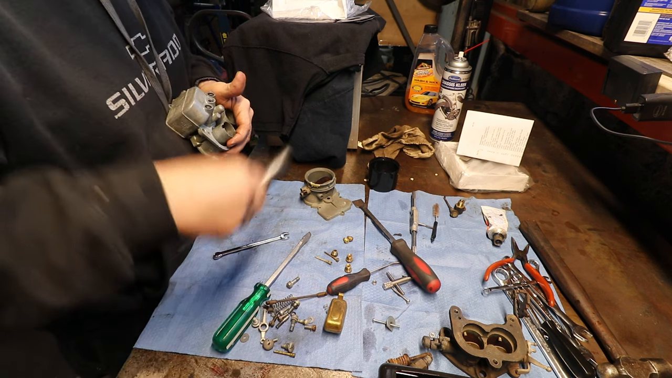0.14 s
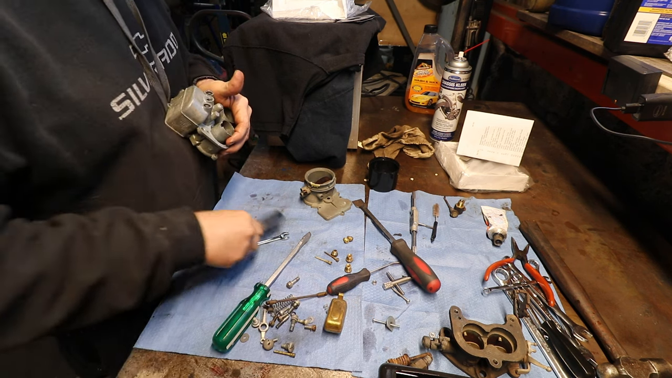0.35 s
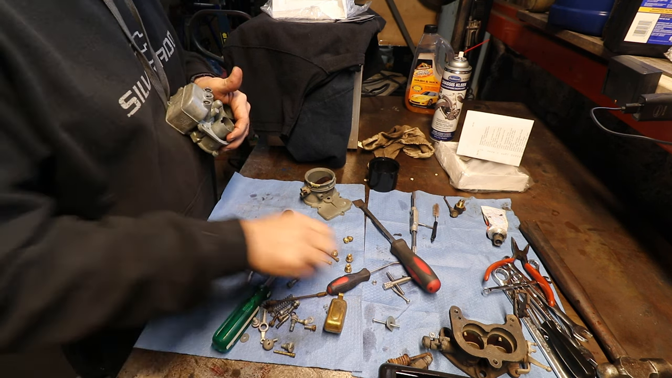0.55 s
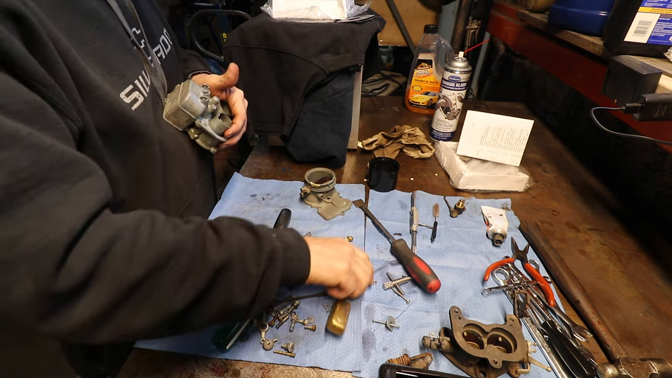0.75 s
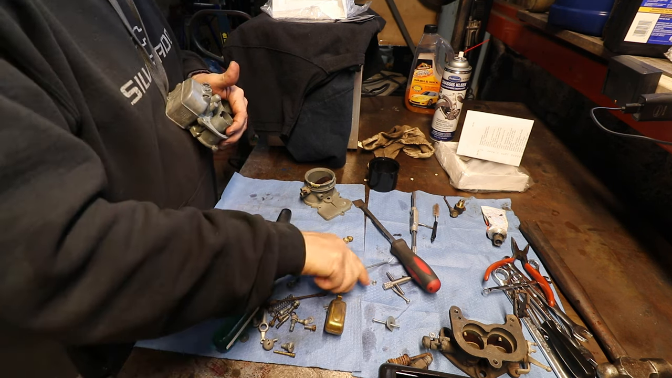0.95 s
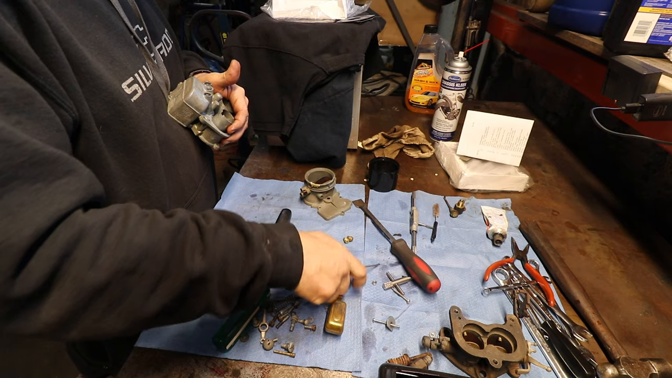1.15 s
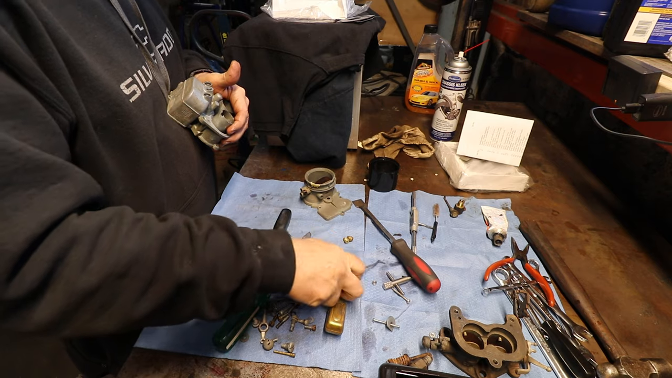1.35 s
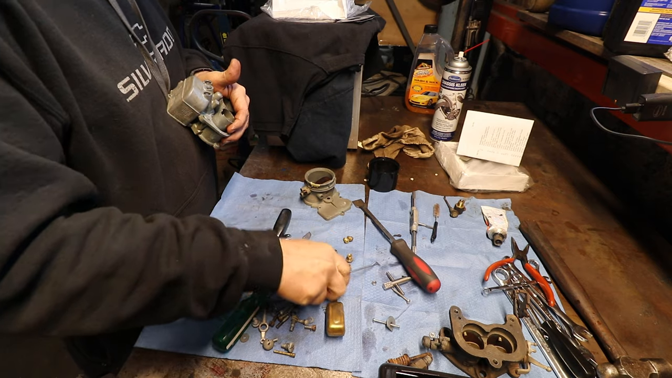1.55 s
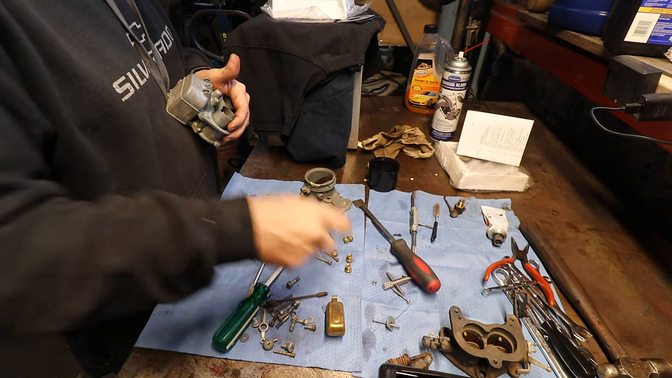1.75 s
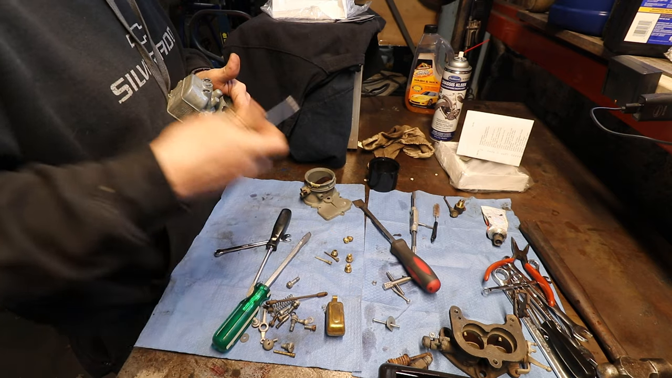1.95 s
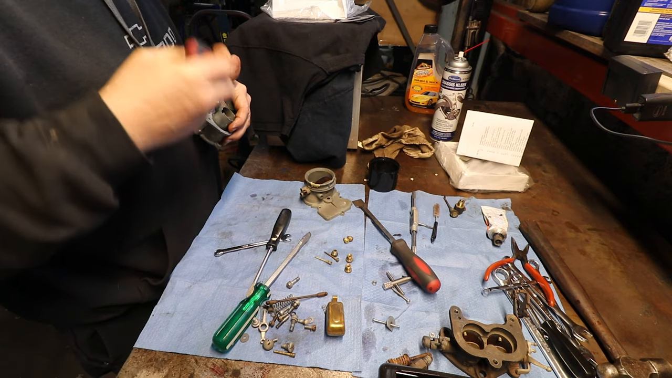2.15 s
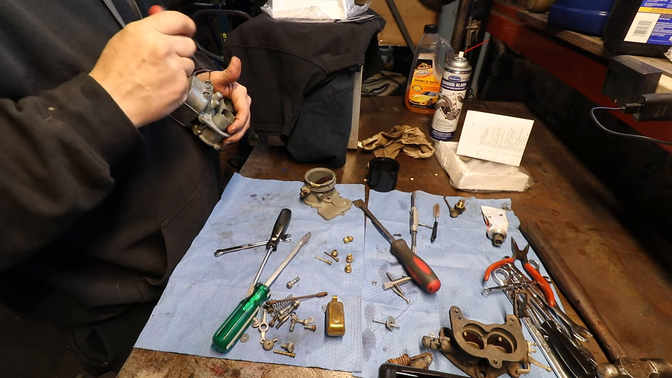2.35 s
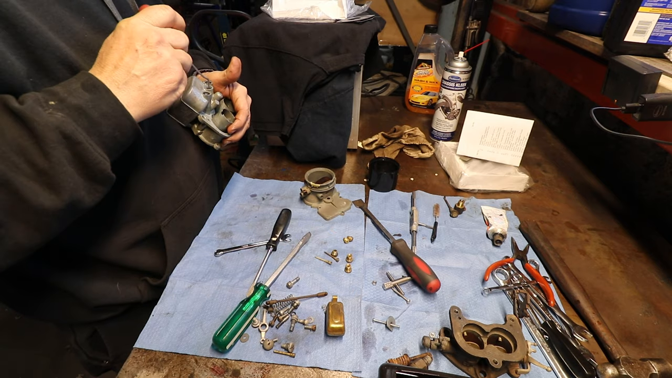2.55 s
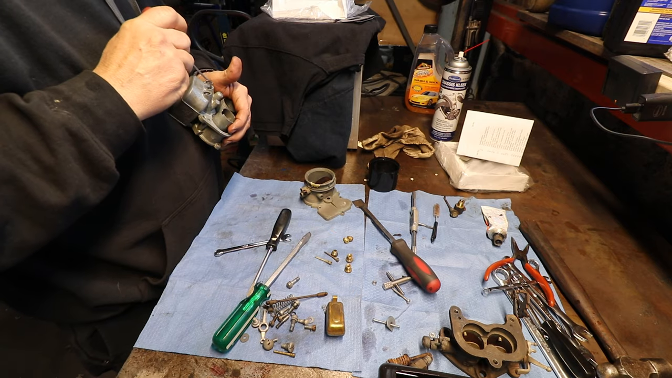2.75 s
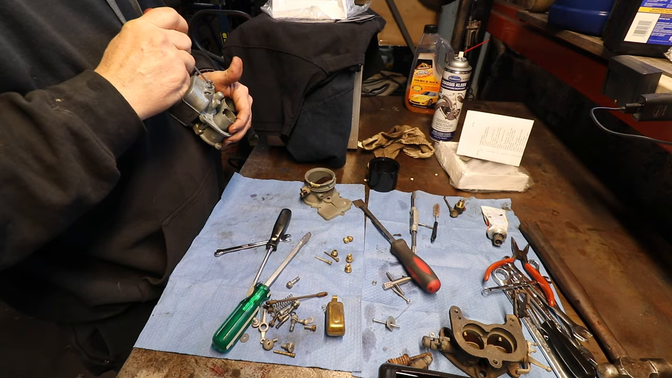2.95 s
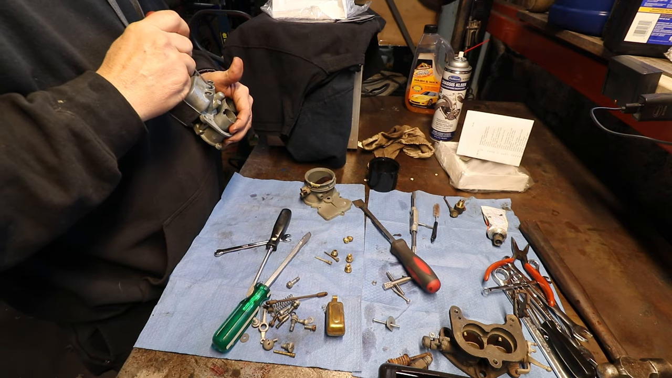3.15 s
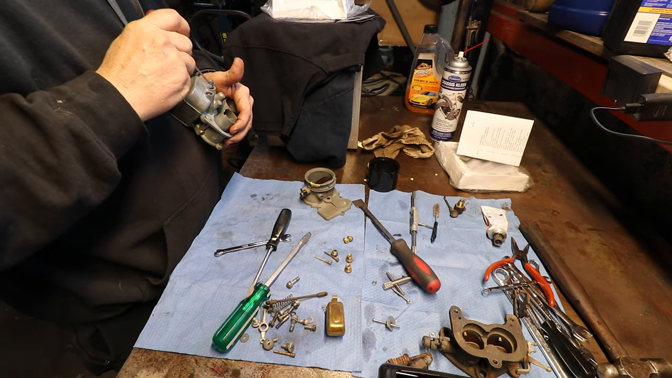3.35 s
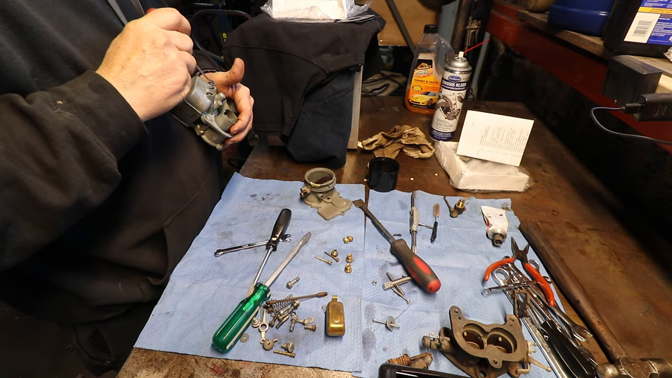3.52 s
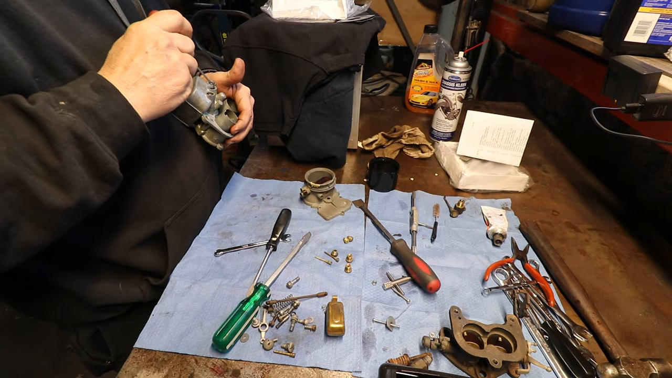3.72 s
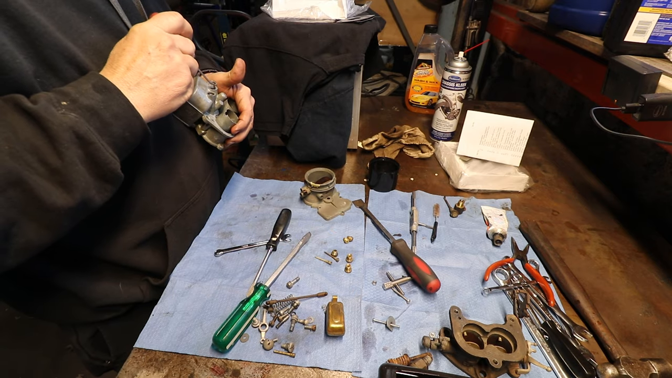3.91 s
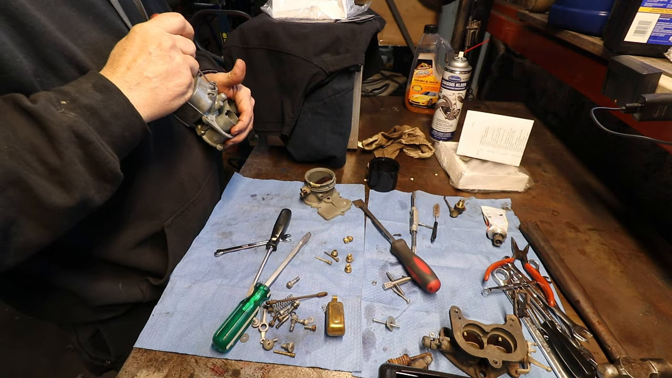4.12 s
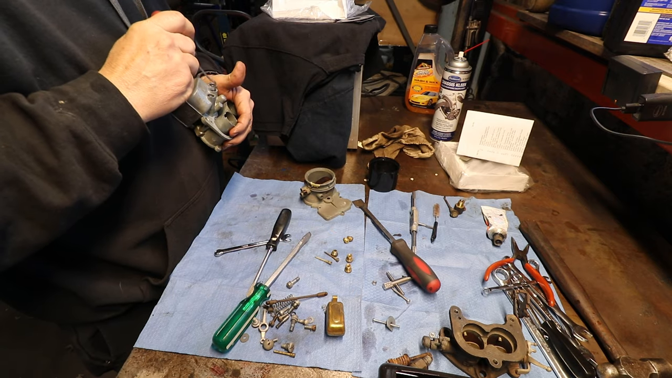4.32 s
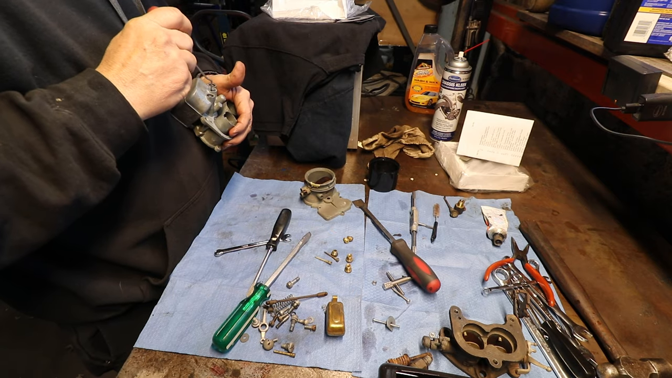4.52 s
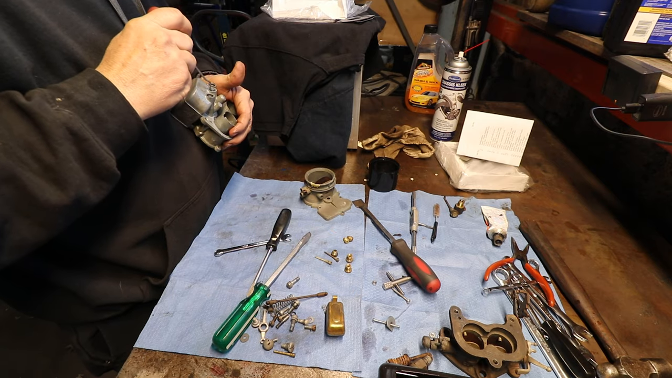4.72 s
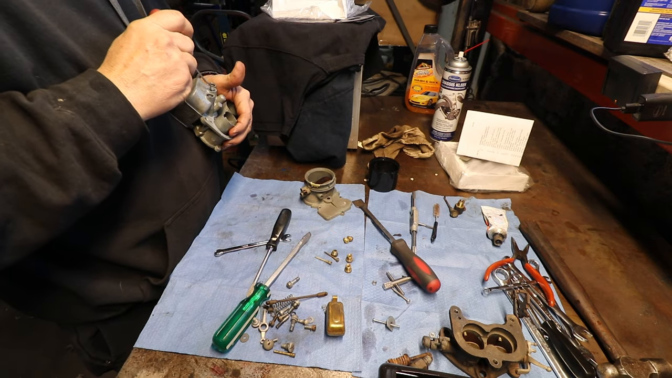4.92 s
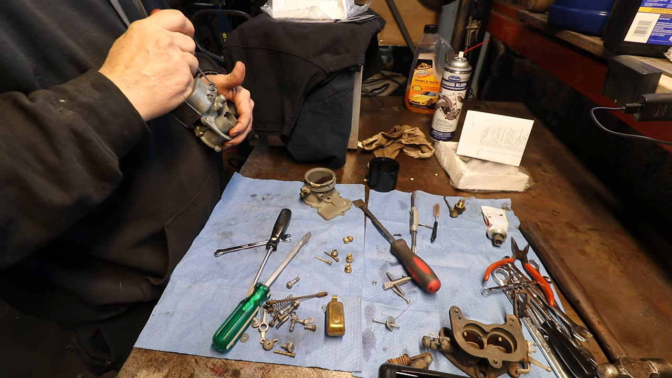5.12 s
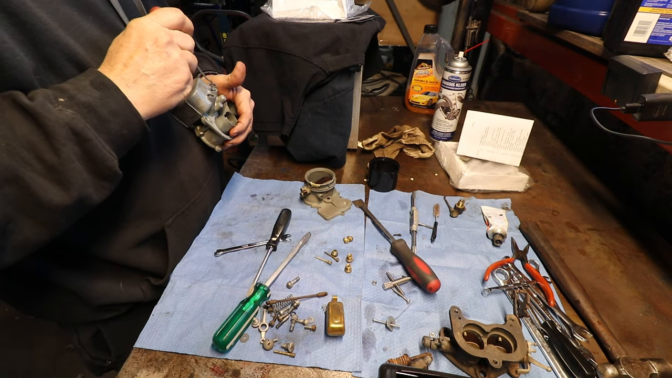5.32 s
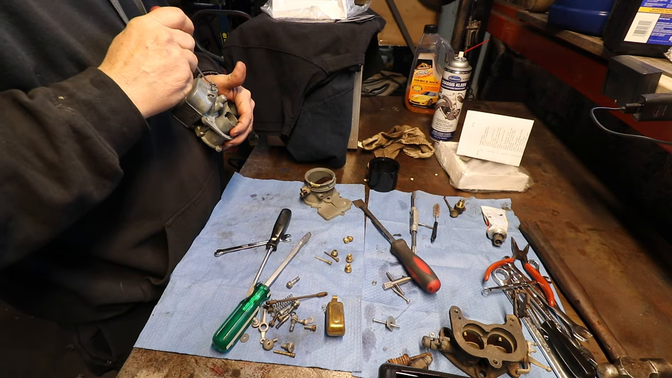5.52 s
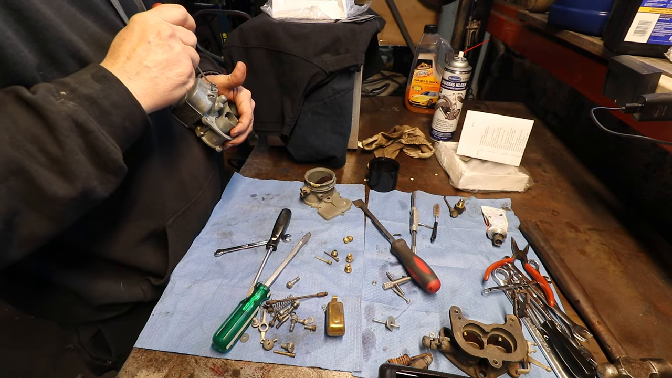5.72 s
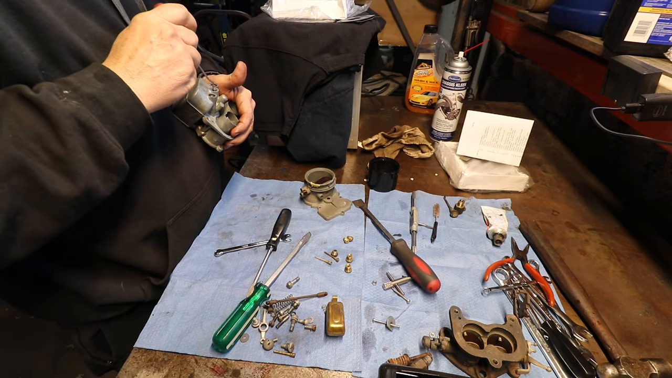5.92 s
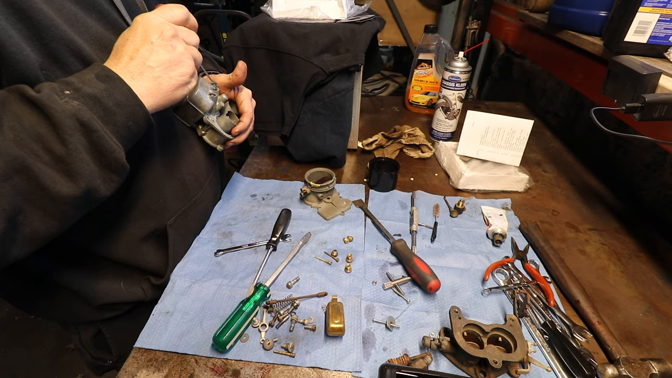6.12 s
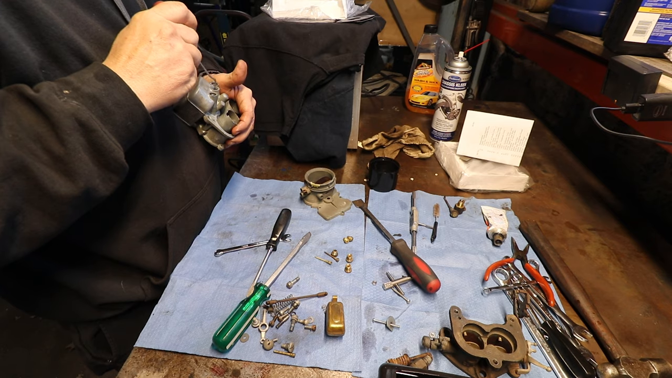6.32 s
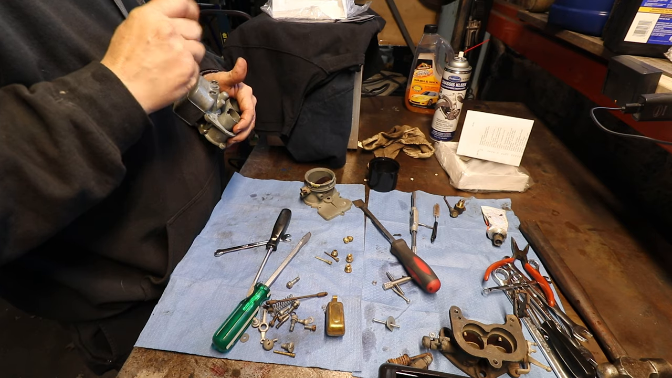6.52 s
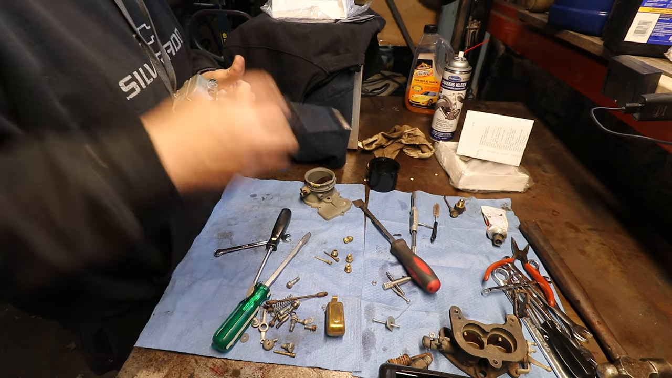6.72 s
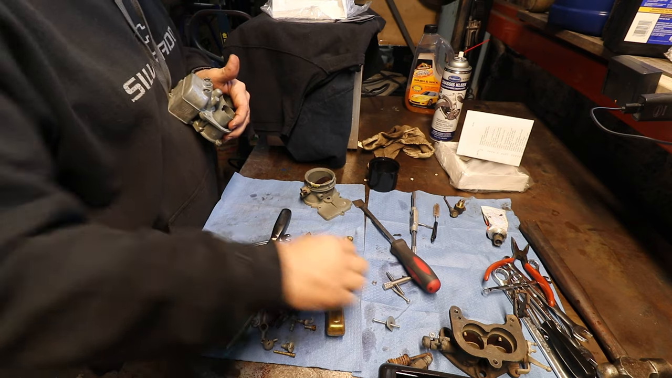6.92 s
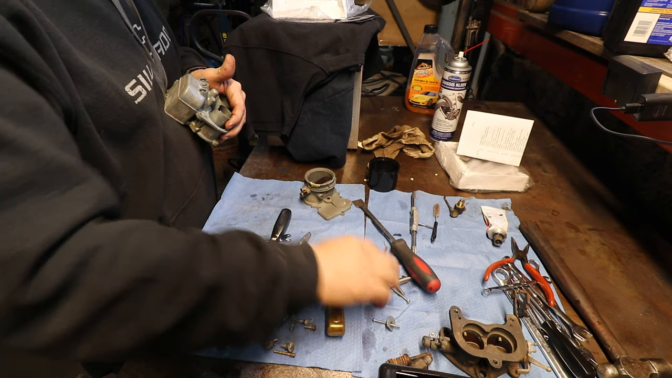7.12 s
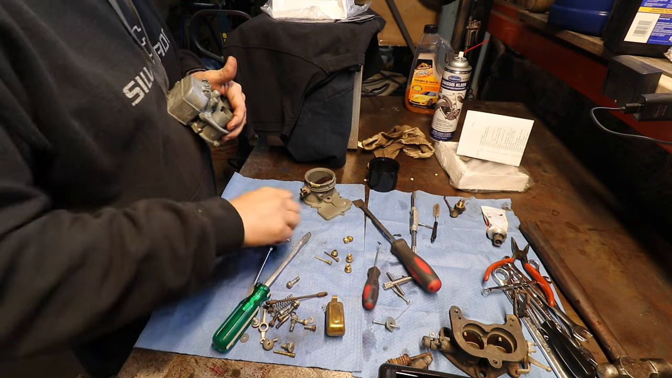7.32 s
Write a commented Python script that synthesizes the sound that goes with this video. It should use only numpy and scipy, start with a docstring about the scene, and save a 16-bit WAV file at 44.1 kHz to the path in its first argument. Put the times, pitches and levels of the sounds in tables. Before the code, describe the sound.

In a small workshop, a screwdriver drops among steel tools with a sharp, ringing clatter and a thump from the wooden bench. A few light clinks follow as a brass part is picked up. It is screwed into a metal housing with faint ticks, scrapes and tiny squeaks, and at the end a tool is set down with a soft thud. A quiet motor hum and fan run underneath, all heard from close by.

```python
"""Small metalwork at the bench

A dropped screwdriver clatters among steel tools, which ring over the boom of the wooden top. A small
brass part is picked up with a few clinks and screwed into a hand-held cast housing: faint ticks, scrapes
and stick-slip squeaks. A tool is laid down with a thud. Under it all, a motor hums and a fan blows."""
import sys
import numpy as np
from scipy import signal
from scipy.fft import rfft, irfft, next_fast_len
from scipy.io import wavfile
from scipy.ndimage import map_coordinates

SR = 44100
rng = np.random.default_rng(int(sys.argv[2]) if len(sys.argv) > 2 else 0)


def materialize(psi):
    """Save the field psi as 16-bit PCM at rate SR to the path in sys.argv[1].

    A 1-D psi becomes a single channel; in a 2-D psi each row is a channel.
    """
    bounded = np.clip(np.atleast_2d(psi).T, -1, 1)
    quanta = np.round(bounded * 32767).astype(np.int16)
    wavfile.write(sys.argv[1], SR, quanta)


N = 324576
T = np.arange(SR // 2) / SR  # time axis of one hit (s)
TOP_HZ = 15800  # band limit of the mix

# Table levels are relative: each layer sets its own gain.
# motor hum: f/Hz, level/dB, waver/dB
MOTOR_HUM = [(28.6, -58.5, -6.5), (60.3, -50.5, 0.14), (309.6, -74.5, 3.5), (902, -68, -0.5)]
# the fan's rush of air: f/Hz, level/dB
FAN_AIR = [(12, -42), (22, -16), (32, -12.5), (45, -12.5), (70, -10), (110, -12.5), (306, -17.5),
           (439, -20.5), (519, -19.5), (881, -18), (985, -25), (1340, -23), (1720, -28.5), (2150, -26.5),
           (2400, -29.5), (4000, -34.5), (5500, -37), (15500, -39.5)]
# resonances of the fan's casing: f/Hz, width/Hz, level/dB
FAN_CASING = [(140, 25, 1.5), (296, 2.7, -1), (534, 28, -2.5), (624, 91, -11), (706, 14.4, -3.5),
              (762, 6.2, -1), (888.4, 35, -1), (1050, 23.4, -7), (1147, 17, -8.5), (1348, 20, -4.5),
              (2180, 37, -12.5)]
# a tool hits tools and bench: t/s, crack level/dB, ring level/dB, ring f/Hz, thump level/dB, thump f/Hz
BLOWS = [(0.4937, -18, -3.5, 3200, -20, 348), (0.5103, -20.5, -17, 2270, -29.5, 302),
         (0.5301, -30, -30, 2880, -27.5, 605), (0.550, -26, -39, 2460, -21.5, 376),
         (0.5627, -19, -10, 4120, -25.5, 950), (0.5638, -39, -22, 1480, -28, 606),
         (0.572, -25.5, -16, 4100, -21.5, 910), (0.5904, -23.5, -31, 7120, -24.5, 890),
         (0.601, -40, -39, 7260, -32, 160), (0.626, -52, -33, 2240, -34, 450),
         (0.6346, -32, -35.5, 2520, -40, 800), (7.2290, -56, -51, 2560, -24.5, 328),
         (7.2527, -39.5, -31, 2550, -32.5, 180), (7.254, -62, -38, 3510, -42, 260)]
# colour of a steel-on-steel crack: f/Hz, level/dB
CRACK = [(300, -35), (1200, -10.5), (1800, -0.5), (2900, 5), (3800, -6.5), (4700, 1), (5500, -8),
         (6000, -19.5), (6700, -2.5), (9000, -41), (16000, -43.5)]
# bright fizz on top of a metal contact: f/Hz, level/dB
FIZZ = [(2500, -34), (5000, 7.5), (7000, -3), (8500, -0.5), (12000, 1.5), (16000, -11)]
# modes of the wooden bench top: f/Hz, level/dB, t60/s
BENCH_MODES = [(140.4, 8.5, 0.04), (167, -16.5, 0.31), (256, -2.5, 0.22), (323, -5.5, 0.16),
               (344, 1, 0.026), (494, -3.5, 0.079), (533, -6.5, .06), (681.4, -0.5, 0.15),
               (813, 0.5, 0.065), (877, 1.5, 0.11), (1099, -8, 0.065), (1407, 0, .06)]
# dull knock of the wood: f/Hz, level/dB
WOOD_KNOCK = [(60, -26), (110, -16), (160, 6.5), (300, -13.5), (900, -5.5), (1200, -14.5), (2000, -17),
              (4000, -38.5)]
# modes of a steel tool kicked into the air: f/Hz, level/dB, rise/s, t60/s once landed
KICKED_MODES = [(4163, -32, .075, .13), (4893, -31, .035, .2), (6923, -35, .025, .08),
                (9216, -40, .045, .08), (10490, -48, .015, .22), (11512, -41, .025, .25),
                (14650, -46.5, .003, .14), (14667, -52, .003, .14)]
# workshop reverb: f/Hz, t60/s
ROOM_DECAY = [(150, 0.87), (800, 0.5), (2500, 0.29), (6000, 0.15), (14000, .12)]
# a thin steel tool and the brass part touch: t/s, tool level/dB, brass level/dB
CLINKS = [(0.7405, -50, -44), (0.7995, -58, -53), (0.948, -44, -36), (1.549, -52, -60), (1.561, -44, -58)]
# modes of the thin tool: f/Hz, level/dB, t60/s before finger damping
THIN_TOOL_MODES = [(1978, 2.5, 0.48), (2980, 1, 0.3), (4470, -13.5, 0.35), (4880, 0, 0.16),
                   (5500, -19, 0.23), (6900, -12, .21), (8037, -16, 0.31), (9000, -10.5, .1),
                   (11700, -12, 0.1), (12100, -10, 0.08)]
# modes of the brass part: f/Hz, level/dB, t60/s before finger damping
BRASS_MODES = [(3587, 3.5, 0.28), (3590, 1, 0.17), (4030, -12.5, 0.24), (6260, -15, .08),
               (6500, -17.5, 0.084), (9380, -19.5, 0.082), (9530, -10, 0.064), (10200, -22, .06),
               (12900, -21, .06), (13660, -35, .08), (15400, -26, 0.055)]
# colour of light clicks and friction: f/Hz, level/dB
CONTACT = [(600, -24), (1500, 1), (2400, 3.5), (3200, 5), (4400, -4), (5400, -14), (7000, -8), (10000, -25),
           (16000, -24)]
# parts slide over each other and the paper mat: middle t/s, length/s, level/dB
SLIDES = [(0.79, 0.13, -56.5), (1.187, 0.15, -61), (1.36, 0.041, -59), (1.563, 0.051, -50.5),
          (1.718, 0.044, -52), (1.97, 0.36, -63)]
# the screwdriver turns and the thread grinds: middle t/s, length/s, level/dB
TURNS = [(2.828, 0.042, -62), (3.172, 0.12, -69), (4.38, 0.082, -56.5), (5.05, 0.11, -62),
         (6.066, 0.07, -64)]
# resonances of the hand-damped housing: f/Hz, width/Hz, level/dB
HELD_MODES = [(840, 70, -24), (1370, 84, 2), (2230, 140, 3), (3020, 98, -8.5), (3740, 91, 2.5),
              (4370, 88, 3.5), (5770, 200, -11), (6740, 200, -21)]
# the part catches in the housing: t/s, level/dB
CATCHES = [(3.1507, -40), (3.2021, -36.5), (3.2245, -37.5), (3.924, -44), (3.9549, -44), (4.3557, -39),
           (4.4306, -37.5), (4.8085, -41), (5.47, -38), (5.8301, -43), (6.0407, -40.5), (6.0474, -38),
           (6.0656, -37.5)]
# the housing shifts in the hand with a dull knock: t/s, level/dB, f/Hz, t60/s
GRIP_KNOCKS = [(3.966, -42, 986, .039)]
# the blade slips in its slot: t/s, level/dB
BLADE_SLIPS = [(3.429, -51.5), (4.335, -60), (6.073, -57), (6.099, -46)]
# bright ring of the housing: f/Hz, level/dB, t60/s
HOUSING_MODES = [(2345, -1.5, 0.079), (4530, 2, 0.063), (4810, -5, 0.059), (7400, -8, 0.074),
                 (8750, -7, 0.036), (12200, -11, 0.062)]
# the thread squeaks: start t/s, length/s, first f/Hz, last f/Hz, level/dB
SQUEAKS = [(4.334, 0.052, 3170, 3040, -57), (4.38, 0.05, 3170, 2640, -58.5), (4.97, 0.059, 3210, 3600, -67),
           (5.045, 0.039, 3000, 2600, -75)]
# a tiny part is nudged as the tool is laid down: t/s, level/dB
TINKLES = [(7.2322, -46)]
# modes of the tiny part: f/Hz, level/dB, t60/s
TINY_PART_MODES = [(5500, -5, .035), (9200, -14, 0.12), (10600, -9.5, .025), (11740, -9.5, .02),
                   (15200, -0.5, 0.051)]
# each channel's noise floor: f/Hz, level/dB
HISS = [(30, -8), (150, 7), (450, 6.5), (1100, -19.5), (3000, -18), (5500, -1), (15000, 0.5)]


def amp(db):
    """Decibels to gain."""
    return 10 ** (np.asarray(db) / 20)


def unit(x):
    """Scale to rms 1."""
    return x / np.sqrt(np.mean(x ** 2) + 1e-20)


def along(points, hz):
    """Read a curve of (f/Hz, value) points on a log frequency axis."""
    f, v = np.transpose(points)
    return np.interp(np.log(hz + 1), np.log(f + 1), v)


def filtered(x, response):
    """EQ x with a gain that is a function of frequency."""
    size = next_fast_len(len(x) + 8192)
    return irfft(rfft(x, size) * response(np.fft.rfftfreq(size, 1 / SR)), size)[:len(x)]


def resonances(modes, f):
    """Response of a band-pass bank (f/Hz, width/Hz, level/dB) of alternating polarity."""
    return sum((-1) ** k * amp(db) * 1j * f * width / (hz * hz - f * f + 1j * f * width)
               for k, (hz, width, db) in enumerate(modes))


def noise(spectrum, size=len(T)):
    """Coloured noise of rms 1."""
    return unit(filtered(rng.standard_normal(size), lambda f: amp(along(spectrum, f))))


def wobble(rate):
    """A smooth random modulator, rate knots a second."""
    return map_coordinates(rng.standard_normal(int(N * rate / SR) + 4), [np.arange(N) * rate / SR])


def attack(rise_s):
    """Onset envelope of a hit."""
    return 1 - np.exp(-T / rise_s)


def fade(t60):
    """Free decay after a hit."""
    return amp(-60 * T / max(t60, .001))


def tone(hz):
    """A sine with a random starting phase."""
    return np.sin(2 * np.pi * (hz * T + rng.random()))


def burst(carrier, t60):
    """A dying noise burst whose energy is set by its decay alone."""
    shape = fade(t60)
    return unit(carrier * shape) * np.sqrt(np.mean(shape ** 2))


def add(track, s, sound):
    """Mix a sound into the track at s seconds."""
    part = track[max(round(s * SR), 0):][:len(sound)]
    part += sound[:len(part)]


def motor_and_fan(air_db=-54.5, casing_db=-59):
    """The bed: a motor's wavering hum and a fan's rush, coloured by its casing."""
    t = np.arange(N) / SR
    hum = sum(np.sqrt(2) * amp(db + waver_db * wobble(3)) * np.sin(2 * np.pi * (hz * t + rng.random()))
              for hz, db, waver_db in MOTOR_HUM)
    casing = unit(filtered(rng.standard_normal(N), lambda f: resonances(FAN_CASING, f)))
    return hum + amp(air_db) * noise(FAN_AIR, N) + amp(casing_db) * casing


def impacts(rebound_s=.0075, metal_loss_db=12, thump_loss_db=6, detune=0.033):
    """Every blow and its softer rebound, which lands on a slightly different spot."""
    for s, crack_db, ring_db, ring_hz, thump_db, thump_hz in BLOWS:
        yield s, crack_db, ring_db, ring_hz, thump_db, thump_hz
        yield (s + rebound_s * rng.uniform(.9, 1.1), crack_db - metal_loss_db, ring_db - metal_loss_db,
               ring_hz * (1 + detune * rng.random()), thump_db - thump_loss_db, thump_hz)


def tool_clatter(medium_db=-19.5, medium_t60=0.021, press_damping=.36, spread=0.18):
    """Steel on steel: a crack and a short cluster of resonances set by where the tools meet."""
    out = np.zeros(N)
    for s, crack_db, ring_db, hz, _, _ in impacts():
        # harder blows press the parts together and choke the ring
        t60 = medium_t60 * amp(-press_damping * (ring_db - medium_db))
        neighbours = sum(tone(min(hz * (1 + side * spread * rng.uniform(0.57, 0.77)), TOP_HZ))
                         for side in (-1, 1))
        ring = amp(ring_db) * (tone(hz) + amp(-12) * neighbours) * fade(t60) * attack(0.00031)
        # they also open up the crack, and the fizz grows twice as fast in dB
        force_db = crack_db - medium_db
        cutoff_hz = 8120 * 2 ** (force_db / 13.5)
        crack_noise = filtered(noise(CRACK), lambda f: 1 / (1 + (f / cutoff_hz) ** 8))
        crack = amp(crack_db) * burst(crack_noise, t60=0.032)
        fizz = amp(-29.5 + 2 * force_db) * burst(noise(FIZZ), t60=0.017)
        add(out, s, ring + (crack + fizz) * attack(0.00017))
    return out


def bench_thumps(above_db_per_octave=10, below_db_per_octave=14, lag_s=0.00045):
    """The wooden top booms just after the metal, focused around each blow's thump frequency."""
    out = np.zeros(N)
    for s, _, _, _, db, thump_hz in impacts():
        def focus(f):
            """Gain that rolls off either side of the thump."""
            octaves = np.log2((f + 1) / thump_hz)
            return amp(np.minimum(-above_db_per_octave * octaves, below_db_per_octave * octaves))

        boom = sum(amp(mode_db + rng.normal(0, 0.55)) * focus(hz) * tone(hz) * fade(t60)
                   for hz, mode_db, t60 in BENCH_MODES)
        knock = burst(filtered(noise(WOOD_KNOCK), focus), t60=0.067)
        add(out, s + lag_s, amp(db) * (0.43 * boom + amp(-4) * knock) * attack(0.0008))
    return out


def kicked_tool(kicked_s=0.496, landed_s=0.568):
    """A steel tool's ring builds while it rattles free and dies once it lies on the mat."""
    out = np.zeros(N)
    resting_s = np.maximum(T - (landed_s - kicked_s), 0)
    ring = sum(amp(db - 60 * resting_s / t60) * attack(rise) * tone(hz)
               for hz, db, rise, t60 in KICKED_MODES)
    add(out, kicked_s, ring)
    return out


def room(send):
    """The workshop's short reverb, dying sooner in the treble."""
    hz, t, spectrum = signal.stft(rng.standard_normal(len(T)), SR, nperseg=256)
    decay = amp(-60 * t / along(ROOM_DECAY, hz)[:, None])
    tail = signal.istft(spectrum * decay, SR, nperseg=256)[1]
    return signal.fftconvolve(send, tail / np.linalg.norm(tail))[:N]


def fingered_ring(modes, tilt_db_per_octave, finger_t60=1.5):
    """A struck piece rings from rest, lightly damped by the fingers."""
    return sum(amp(db + tilt_db_per_octave * np.log2(hz / 3500) + rng.normal(0, 0.69))
               * np.sin(2 * np.pi * hz * T) * fade(t60) for hz, db, t60 in modes) * fade(finger_t60)


def clinks(firm_db=-34.5):
    """Tool and brass ring at each touch, brighter when it is firmer; two close brass modes beat."""
    out = np.zeros(N)
    for s, tool_db, brass_db in CLINKS:
        force_db = max(tool_db, brass_db)
        tilt = 5 + 0.36 * (force_db - firm_db)
        click = amp(force_db - 5) * burst(noise(CONTACT) + amp(-4) * noise(FIZZ), t60=0.068)
        tool = amp(tool_db) * fingered_ring(THIN_TOOL_MODES, tilt)
        brass = amp(brass_db) * fingered_ring(BRASS_MODES, tilt)
        add(out, s, (tool + brass + click) * attack(0.00062))
    return out


def scrapes(strokes, fizz_db, grain_db=4):
    """Short swells of friction, grainy with tiny slips; the surface sets their brightness."""
    t = np.arange(N) / SR
    friction = noise(CONTACT, N) + amp(fizz_db) * noise(FIZZ, N)
    grain = unit(amp(grain_db * wobble(350)))
    swells = sum(amp(db) * np.exp(-(2 * (t - s) / length) ** 2) for s, length, db in strokes)
    return grain * friction * swells


def tick(detune=0.053):
    """One dry click in the hand-damped housing; the changing grip shifts its resonances."""
    modes = [(hz * (1 + detune * rng.normal()), width, db + rng.normal(0, 2.0))
             for hz, width, db in HELD_MODES]
    hollow = sum(amp(db) * tone(hz) * np.exp(-np.pi * width * T) for hz, width, db in modes)
    body = filtered(rng.standard_normal(len(T)), lambda f: resonances(modes, f) / (1 + (f / 8000) ** 4))
    grit = burst(body, t60=0.021)
    click = burst(noise(CONTACT), t60=0.027)
    return (amp(-12) * hollow + amp(-7) * grit + amp(-5) * click) * attack(0.00029)


def housing_ticks(catch_db=-5, slips_per_turn=2, slip_db=1, scatter_db=4):
    """Clear catches, faint random slips around each turn, and a dull knock as the housing shifts."""
    out = np.zeros(N)
    for s, db in CATCHES:
        add(out, s, amp(db + catch_db) * tick())
    for s, length, db in TURNS:
        for offset, strength in rng.standard_normal((slips_per_turn, 2)):
            add(out, s + offset * length / 2, amp(db + slip_db + scatter_db * strength) * tick())
    for s, db, hz, t60 in GRIP_KNOCKS:
        add(out, s, amp(db) * tone(hz) * fade(t60) * attack(.0003))
    return out


def blade_slips():
    """The blade slips in its slot: a tick with a bright snap that sets the housing ringing briefly."""
    out = np.zeros(N)
    for s, db in BLADE_SLIPS:
        ring = sum(amp(mode_db + rng.normal(0, 3.7)) * tone(hz) * fade(t60)
                   for hz, mode_db, t60 in HOUSING_MODES)
        snap = amp(4) * burst(noise(FIZZ), t60=0.018)
        add(out, s, amp(db) * (amp(-1) * tick() + (ring + snap) * attack(.0002)))
    return out


def thread_squeaks(jitter=0.05, rough_db=4):
    """Stick and slip in the thread gives a faint, unsteady gliding whistle."""
    out = np.zeros(N)
    for s, length, first_hz, last_hz, db in SQUEAKS:
        size = round(length * SR)
        pitch = np.linspace(first_hz, last_hz, size) * (1 + jitter * wobble(373)[:size])
        roughness = amp(rough_db * wobble(174)[:size])
        whistle = unit(np.sin(2 * np.pi * np.cumsum(pitch) / SR) * roughness)
        add(out, s, amp(db) * whistle * signal.windows.tukey(size, .5))
    return out


def tinkle():
    """A tiny part snaps over with a short, high ring."""
    out = np.zeros(N)
    ring = sum(amp(db) * tone(hz) * fade(t60) for hz, db, t60 in TINY_PART_MODES)
    snap = amp(-3) * burst(noise(FIZZ), t60=0.028)
    for s, db in TINKLES:
        add(out, s, amp(db) * (ring + snap) * attack(.0004))
    return out


def scene():
    """A centred mix: the bench work feeds the reverb, wood most of all; the machine bed stays dry."""
    wood = bench_thumps()
    hits = tool_clatter() + tinkle()
    rings = kicked_tool() + clinks()
    handling = housing_ticks() + blade_slips() + thread_squeaks()
    handling += scrapes(SLIDES, fizz_db=-6.5) + scrapes(TURNS, fizz_db=-18)
    reverb = room(amp(-9.5) * wood + amp(-32) * rings + amp(-15) * (hits + handling))
    mono = wood + hits + rings + handling + reverb + motor_and_fan()
    return np.array([mono, mono])


def record(dry, hiss_db=-73.0):
    """Give each channel its own faint hiss and cut everything above the band limit."""
    return np.array([filtered(channel + amp(hiss_db) * noise(HISS, N), lambda f: f < TOP_HZ)
                     for channel in dry])


dry = scene()
out = record(dry)
materialize(out)
```